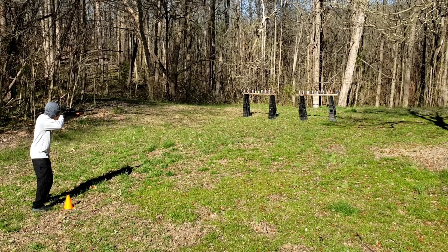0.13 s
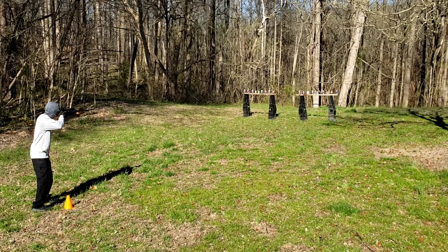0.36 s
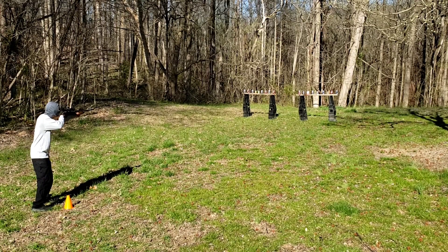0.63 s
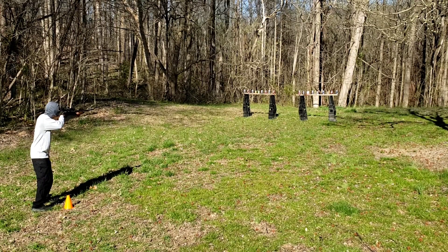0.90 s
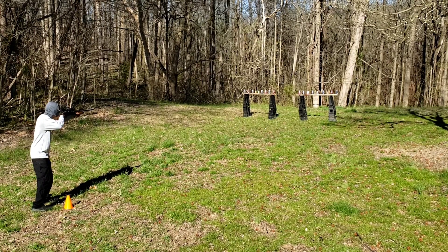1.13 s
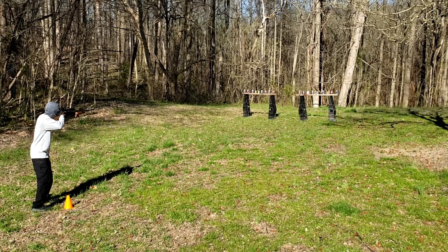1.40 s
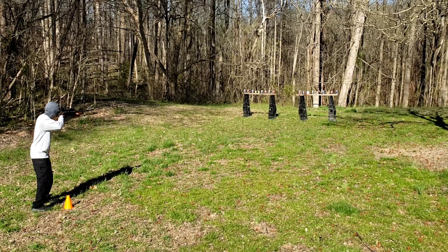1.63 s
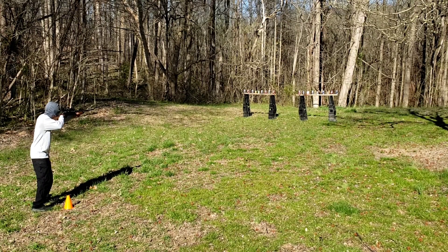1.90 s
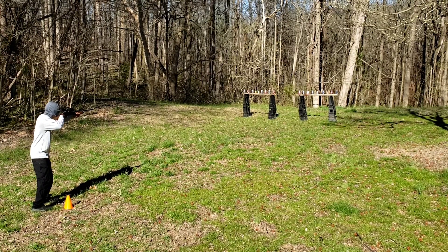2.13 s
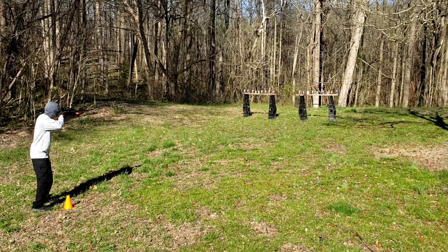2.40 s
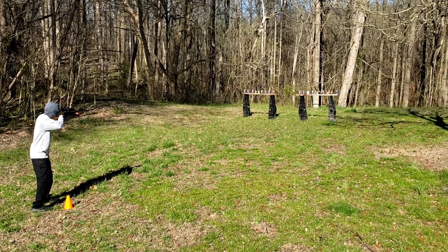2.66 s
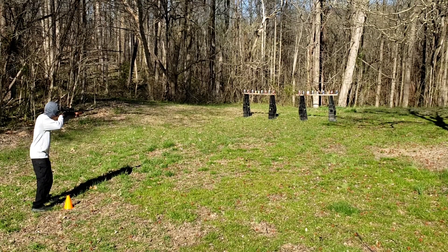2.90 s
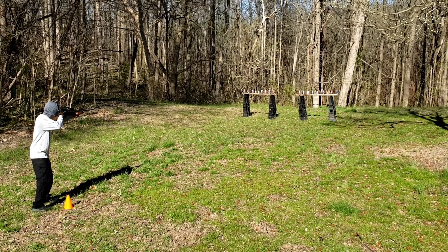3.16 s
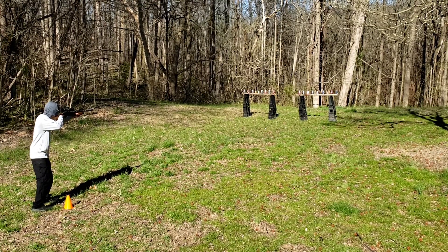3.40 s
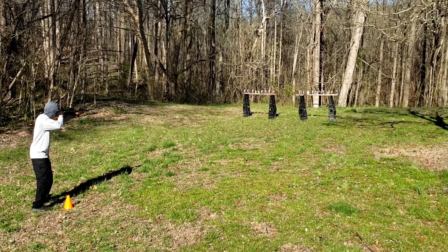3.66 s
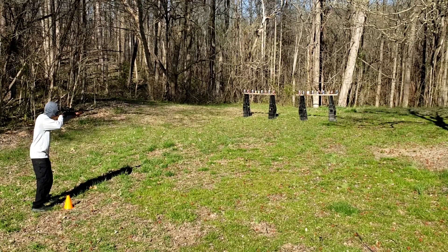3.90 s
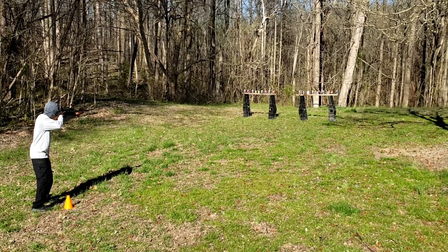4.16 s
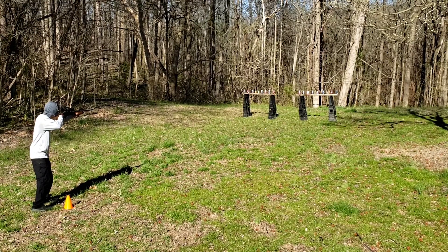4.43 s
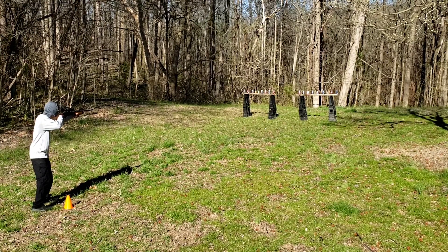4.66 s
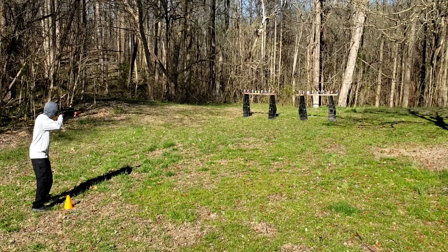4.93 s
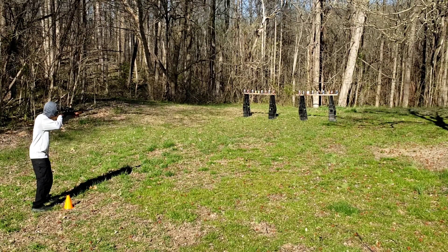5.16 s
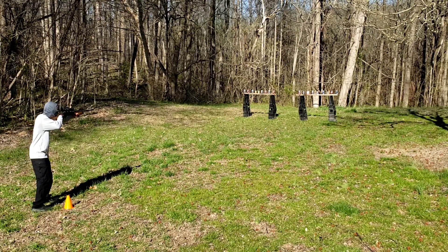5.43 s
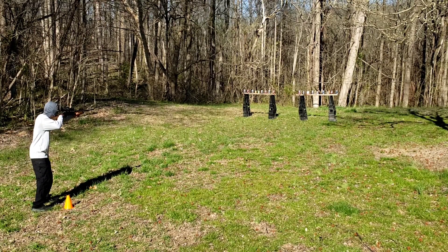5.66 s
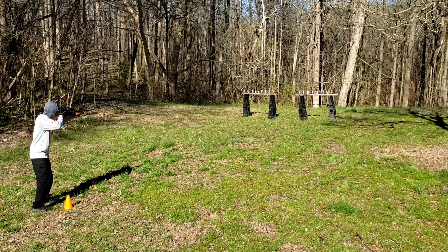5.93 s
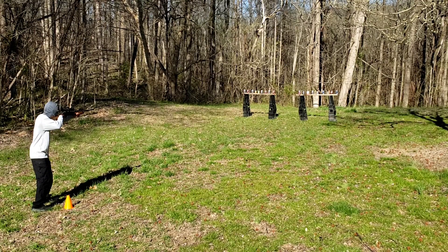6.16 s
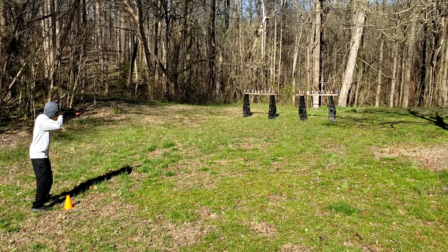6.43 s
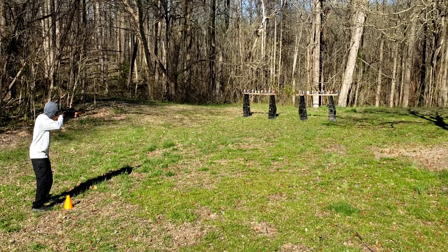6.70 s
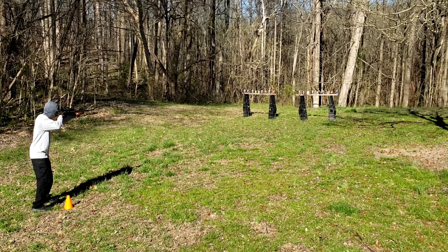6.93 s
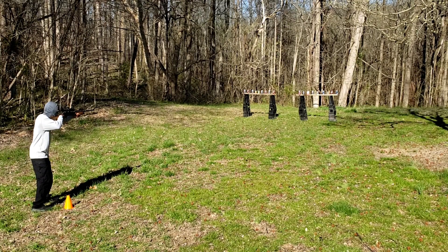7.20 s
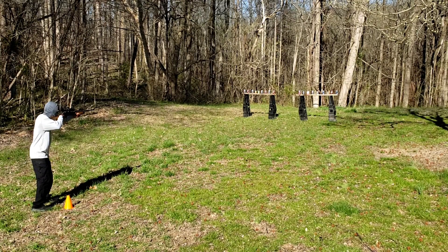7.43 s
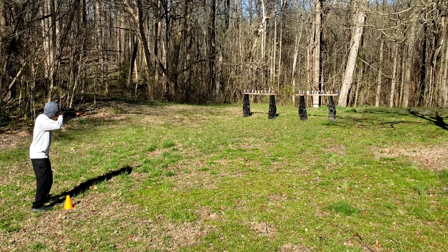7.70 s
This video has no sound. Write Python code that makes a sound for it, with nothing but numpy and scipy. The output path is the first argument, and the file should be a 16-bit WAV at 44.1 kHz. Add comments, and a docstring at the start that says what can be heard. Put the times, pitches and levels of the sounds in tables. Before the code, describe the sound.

Outdoor target shooting on grass at a forest edge. The rifle, left of the stereo microphone, gives four short bright cracks with a light low thump. Small hard hits answer from the distant targets, then the slide is pulled back and shoved forward with rattling metal clicks. Every sound scatters off the trunks as a short hissy tail. Very faint bird whistles early on; low, soft traffic rumble throughout.

```python
"""On a lawn at the edge of a wood, left of the microphone, an air rifle's slide ends a pull and is pushed home.
Then come four shots, each with a jet of gas, a low push of recoil and another rack of the slide. Pellets smack far
targets after each shot. Rifle and slide are clicks, rattles and rings that bounce once off the grass; the trees
answer every shot, stroke and smack with a long hiss of shaped noise. Two faint birds whistle in gliding tones, one
in the first second and one past the second; under it all far traffic rumbles as low noise below a thin hiss."""
import sys
import numpy as np
from scipy import signal
from scipy.fft import rfft, irfft, next_fast_len
from scipy.io import wavfile
from scipy.ndimage import uniform_filter1d, map_coordinates

SR = 44100
rng = np.random.default_rng(int(sys.argv[2]) if len(sys.argv) > 2 else 0)


def decibels_to_gain(level_db):
    """Convert a level in decibels to a linear amplitude gain (20 dB per decade)."""
    exponent = np.asarray(level_db, float) / 20
    return 10 ** exponent


def to_wav(s):
    """Save 16-bit WAV."""
    ch = np.atleast_2d(s).T  # columns
    pcm = np.round(np.clip(ch, -1, 1) * 32767)  # PCM
    wavfile.write(sys.argv[1], SR, pcm.astype(np.int16))


N = 344862  # length in samples

# The four trigger pulls. Each row: start in seconds, strength in dB.
SHOTS = [(0.9946, 1.5), (2.5614, 2), (4.477, 1), (6.2696, 1.5)]
# Blows inside the rifle. Each row: seconds after the pull, crack level in dB, treble over crack in dB,
# stock knock over crack in dB, ring in Hz, rattle's 60 dB decay in seconds.
FIRING = [(0., -25, 9, 4, 1800, .016), (.007, -19, 3, -20, 4410, .01), (.0148, -27, -6, 6, 1370, .018),
          (.0184, -19, 3, -13, 2280, .014), (.0245, -30, 1, -8, 2300, .012)]
# Gas leaving the muzzle: length in seconds, level in dB, treble over that in dB, fall time constant in seconds.
GAS_JET = (0.021, -27.5, -0.5, 0.0065)
# The hammer sliding before it strikes: the same columns as the jet.
HAMMER_SLIDE = (.0095, -52, -2, .001)
# Jolts of air at the muzzle. Each row: seconds after the pull, level in dB, time scale in seconds.
AIR_JOLTS = [(.0004, -21, 0.00027), (0.013, -26, 0.00014)]
# Colour of the firing crack. Each row: frequency in Hz, level in dB.
CRACK_COLOUR = [(500, -27.5), (820, -24.5), (1050, -6), (1400, -2.5), (1800, -3.5), (2800, -6.5), (4400, 0),
                (6000, -3.5), (8000, -19)]


def shots():
    """Hammer, valve and rebound in a fixed order, over jolts of air and the hissing jet."""
    blows = [(s + lag, db + level, *rest) for s, db in SHOTS for lag, level, *rest in FIRING]
    jet_length, jet_db, *jet_rest = GAS_JET
    hammer_length, hammer_db, *hammer_rest = HAMMER_SLIDE
    hisses = [(s, s + jet_length, db + jet_db, *jet_rest) for s, db in SHOTS]
    hisses += [(s - hammer_length, s, db + hammer_db, *hammer_rest) for s, db in SHOTS]
    jolts, t = np.zeros(N), np.arange(SR // 50) / SR
    for s, db in SHOTS:
        for lag, level, width in AIR_JOLTS:
            u = t / width
            dip_and_swell = u * np.e * (u - 2) * np.exp(-u) / 2  # a dip, then a slower swell
            add(jolts, s + lag, decibels_to_gain(db + level) * dip_and_swell)
    metal = contacts(blows, CRACK_COLOUR, click_db=14, ring_db=-6, rise=.0002, alike=TREES_ALIKE)
    return metal + rubs(hisses, CRACK_COLOUR, rise=0.001, grain_db=4.5) + jolts


# Recoil against the shoulder: frequency in Hz, level in dB, 60 dB decay in seconds.
RECOIL = (150, -22, 0.034)


def recoil():
    """One low push that draws in first and is gone after a cycle or two."""
    push, t = np.zeros(N), np.arange(SR // 20) / SR
    hz, db, t60 = RECOIL
    for s, shot_db in SHOTS:
        swing = np.sin(2 * np.pi * hz * t) * (1 - np.exp(-t / 0.0044))
        add(push, s + 0.001, -decibels_to_gain(db + shot_db - 60 * t / t60) * swing)
    return push


# The slide pulled back. Each row: time of the first hard catch in seconds, length from there to the end stop in
# seconds, strength in dB, extra level of the middle catch in dB, extra level of the end stop in dB.
PULLS = [(-.0316, 0.041, 1, -0.5, -5), (1.5117, 0.04, 0.4, 1.5, -2.5), (3.054, .0397, -0.067, 1, 0),
         (5.002, 0.04, 0.39, -1.5, 0.5), (6.8145, 0.037, -0.079, 0, 0)]
# The slide pushed home: the same columns.
PUSHES = [(.161, .0564, -1.1, 2.4, 0.5), (1.7394, .0466, -1.1, 1.8, 2.5), (3.2743, .056, 0.41, 0.49, 0),
          (5.2422, .0548, 0.91, 0.19, -2.5), (7.0331, .0477, -0.13, -0.49, 1)]
# Contacts of one pull. Each row: place along the stroke (0 first hard catch, 1 end stop), crack level in dB,
# treble over crack in dB, stock knock over crack in dB, ring in Hz.
PULL_CONTACTS = [(-.49, -34, -21, -18.5, 1940), (0, -24.5, -12, -17, 2417), (0.556, -26, -12.5, -9, 4740),
                 (0.812, -28.5, 1, -23, 4720), (0.999, -30, -9, -1.5, 2360)]
# Contacts of one push: the same columns.
PUSH_CONTACTS = [(-.09, -43, -6, -16, 1870), (0, -32, -14.5, -16, 1783), (.525, -33, -6, -16, 3700),
                 (.8, -36.5, 10.5, -43, 2890), (0.998, -25.5, -53, -7, 5250)]
# Scrape along the rail in a pull: from and to as places along the stroke, level in dB, treble over that in dB,
# fall time constant in seconds.
PULL_SCRAPE = (.52, 1.15, -39, -1, .014)
# Scrape in a push: the same columns.
PUSH_SCRAPE = (0.74, 1.2, -33.5, -3, 0.0023)
# Colour of the slide's metal. Each row: frequency in Hz, level in dB.
METAL_COLOUR = [(530, -48.5), (900, -12.5), (1030, -5), (1340, -3.5), (1570, -13.5), (1850, -0.5),
                (2050, -10.5), (2300, -2.5), (3320, -3.5), (4480, -1.5), (4770, 0.5), (5650, -6),
                (7500, -12), (9750, -27), (16500, -120)]


def slide():
    """Every stroke meets the same catches in turn, faster or slower, and scrapes between them."""
    rattle_t60 = .026  # s
    strokes = [(row, PULL_CONTACTS, PULL_SCRAPE) for row in PULLS]
    strokes += [(row, PUSH_CONTACTS, PUSH_SCRAPE) for row in PUSHES]
    blows, drags = [], []
    for (s, length, db, middle_db, stop_db), steps, scrape in strokes:
        for extra_db, (place, level, *rest) in zip((0, 0, middle_db, 0, stop_db), steps):
            blows.append((s + place * length, db + level + extra_db, *rest, rattle_t60))
        start, end, level, *rest = scrape
        drags.append((s + start * length, s + end * length, db + level, *rest))
    heard = [blow for blow in blows if blow[0] >= 0]  # the first pull is already under way
    clacks = contacts(heard, METAL_COLOUR, click_db=4.5, ring_db=1.5, rise=0.001, alike=TREES_ALIKE)
    return clacks + rubs(drags, METAL_COLOUR, rise=.006, grain_db=4.5)


# Pellets landing far off. Each row: time in seconds, crack level in dB, treble over crack in dB, ring in Hz.
PELLETS = [(1.279, -27.5, -5, 2370), (1.2965, -42, -16, 1780), (2.627, -33.5, -5, 2480),
           (2.667, -27.5, -17.5, 2274), (4.7993, -32, 0.5, 3430), (4.8394, -42.5, -27, 3760),
           (6.4647, -36, -24, 2970)]


def pellets():
    """Each pellet strikes its target with a hard crack, a short rattle, a ring and a knock."""
    knock_db, t60 = -19.5, 0.018  # over the crack; rattle's 60 dB decay in s
    blows = [(s, db, treble_db, knock_db, hz, t60) for s, db, treble_db, hz in PELLETS]
    return contacts(blows, CRACK_COLOUR, click_db=-2.0, ring_db=-6.0, rise=0.00028, alike=[(1000, 0.72)])


# Modes of the hollow stock. Each row: frequency in Hz, level in dB, 60 dB decay in seconds.
STOCK = [(492, 3.5, 0.052), (574, 2, 0.021), (1036, -9.5, 0.03)]
# Colour of the treble part of clicks, rattles and rubs. Each row: frequency in Hz, level in dB.
TREBLE_COLOUR = [(5000, -26.5), (7000, -5.5), (9500, 0.5), (11500, -2), (13500, -0.5), (15000, -7),
                 (17000, -5)]


def contacts(rows, colour, click_db, ring_db, rise, alike):
    """Each contact: a hard click, a rattle that dies, one loose part ringing, and the stock knocking."""
    rattle, clicks, tones = np.zeros((2, N)), np.zeros((2, N)), np.zeros(N)
    t = np.arange(SR // 12) / SR
    for s, db, treble_db, knock_db, hz, t60 in rows:
        bands = decibels_to_gain([[db], [db + treble_db]])  # body and treble
        shape = decibels_to_gain(-60 * t / max(t60, .003)) * (1 - np.exp(-t / rise))
        add(rattle, s, bands * decibels_to_gain(-3.0) * shape)
        add(clicks, s, -bands * decibels_to_gain(click_db))
        ring_hz = hz * rng.normal(1, .025)
        ring = decibels_to_gain(ring_db - 60 * t / 0.05) * shape * np.sin(2 * np.pi * ring_hz * t)
        knock = np.zeros(len(t))
        for mode_hz, level, life in STOCK:
            mode_db = knock_db + level - 3.5 + rng.normal(0, 1.2)
            knock += decibels_to_gain(mode_db - 60 * t / life) * np.sin(2 * np.pi * mode_hz * t)
        soft_start = 1 - np.exp(-t / 0.0012)  # the stock takes the blow softly
        add(tones, s, decibels_to_gain(db) * (ring + knock * soft_start))
    crack, treble = (clicks[k] + rattle[k] * pair([(100, 0)], alike, N) for k in range(2))
    return coloured(crack, colour) + coloured(treble, TREBLE_COLOUR) + tones


# Left-right likeness of the trees' answer, the rattles and the rubs. Each row: frequency in Hz, likeness (1 same).
TREES_ALIKE = [(600, 0.31), (1400, 0.25), (3000, 0.033)]


def rubs(rows, colour, rise, grain_db):
    """Bursts of gritty broadband noise that hold, then die quickly."""
    t, bands = np.arange(SR // 4) / SR, np.zeros((2, N))
    for start, end, db, treble_db, fall in rows:
        late = t + max(-start, 0)  # a rub begun before time zero is joined part way
        shape = np.clip(late / rise, 0, 1) * np.exp(-np.clip(late - (end - start), 0, 1) / fall)
        add(bands, start, decibels_to_gain([[db], [db + treble_db]]) * shape)
    grit = unit(decibels_to_gain(grain_db * wobble(500)))
    body = bands[0] * pair(colour, TREES_ALIKE, N)
    treble = bands[1] * pair(TREBLE_COLOUR, TREES_ALIKE, N)
    return grit * (body + treble)


# Who answers: the near trunks, the depth of the wood, its far edge. Each row: start in seconds after the sound,
# build-up in seconds, level in dB, fall in dB a second.
TREES = [(.01, .04, 2, 170), (.03, .05, -6, 48), (.158, .015, -4, 200)]
# Colour of the answer. Each row: frequency in Hz, level in dB, share of the treble change (0-1).
TREES_COLOUR = [(150, -8.5, 0.15), (600, 1, 0.3), (3000, 0.5, 0), (5400, -1.5, 0.5), (8000, 0, 0.94),
                (15000, -1, 1.)]


def woods(x, db, nearer=0., loss_db=0., stands=TREES):
    """Countless trunks return each band's energy as diffuse noise; the air eats the treble on the long paths."""
    treble_start_db, treble_loss_db = 3.5, 39  # treble over the rest at first, extra loss a second
    hz, t, z = signal.stft(x, SR, nperseg=128)
    lag = t[t < 1]
    late = lag + nearer  # seconds; a source nearer the trees enters their answer later on
    trees = sum(decibels_to_gain(level - fall_db * (late - start)) ** 2 * np.clip((late - start) / build, 0, 1)
                for start, build, level, fall_db in stands)
    share = np.clip(along(TREES_COLOUR, hz, column=2), 0, 1)[:, None]
    treble_db = share * (treble_start_db - treble_loss_db * late)
    colour_db = along(TREES_COLOUR, hz)[:, None]
    answer = trees * decibels_to_gain(db - 19.0 + colour_db + treble_db - loss_db * lag) ** 2  # loss in dB a second
    energy = signal.fftconvolve(np.mean(np.abs(z) ** 2, axis=0), answer, axes=1)[:, :len(t)]
    trunks = decibels_to_gain(0.94 * wobble(120) + 2.1 * wobble(30))  # single trunks stand out
    noise = signal.stft(pair([(100, 0)], TREES_ALIKE, N) * trunks, SR, nperseg=128)[2]
    noise = noise / np.sqrt(np.mean(np.abs(noise) ** 2))
    return signal.istft(noise * np.sqrt(np.abs(energy)), SR, nperseg=128)[1][:, :N]


# Bird notes. Each row: start in seconds, length in seconds, from Hz, to Hz, level in dB.
BIRDS = [(.29, .07, 5200, 4000, -68), (.545, .08, 5800, 3900, -77), (.815, .08, 5800, 4000, -79),
         (2.09, .11, 2850, 2850, -82), (2.195, .075, 2550, 3000, -82), (2.26, .06, 2050, 2700, -78),
         (2.315, .04, 3100, 2900, -81), (2.395, .03, 3800, 4250, -81), (2.46, .075, 2850, 2800, -81)]


def birds():
    """Short gliding whistles far off among the trees."""
    song = np.zeros(N)
    for s, length, from_hz, to_hz, db in BIRDS:
        t = np.arange(round(length * SR)) / SR
        blur = 750 * uniform_filter1d(rng.standard_normal(len(t)), size=90)  # blurred by leaves
        hz = from_hz + (to_hz - from_hz) * t / length + blur
        swell = np.sin(np.pi * t / length) ** 0.55
        add(song, s, decibels_to_gain(db) * swell * np.sin(2 * np.pi * np.cumsum(hz) / SR))
    song = song * decibels_to_gain(3 * wobble(80)) * decibels_to_gain([[2], [-2]])  # flickering, and to the left
    return song + woods(song, db=7)


# Level of the far traffic. Each row: time in seconds, level in dB.
RUMBLE_LEVEL = [(0.0, -48), (0.67, -48), (0.78, -53), (1.412, -52), (2.2, -48.5), (2.549, -50.5),
                (2.94, -49.5), (3.53, -51.5), (4.4, -50), (4.73, -47.5), (5.31, -48), (5.57, -49.5),
                (6.121, -49), (6.49, -44.5), (6.93, -50), (7.82, -47.5)]
# Colour of the traffic. Each row: frequency in Hz, level in dB.
RUMBLE_COLOUR = [(12, -60.5), (20, -32), (30, -19.5), (47, -7), (70, -0.5), (97, -6.5), (139, -10.5),
                 (173, -17.5), (245, -22), (352, -35.5), (409, -51.5), (500, -43), (650, -74.5),
                 (1100, -120)]
# Colour of the thin hiss. Each row: frequency in Hz, level in dB.
HISS_COLOUR = [(180, -30.5), (300, -10), (507, -16), (727, -19.5), (900, -21.5), (1030, -21.5), (1400, -26),
               (1650, -24.5), (2530, -29.5), (2880, -28.5), (4140, -33.5), (8100, -38.5), (13900, -27.5),
               (15100, -38)]
# Left-right likeness of the background. Each row: frequency in Hz, likeness (1 same, -1 opposed).
AIR_ALIKE = [(60, 0.93), (150, 0.94), (380, -0.026), (940, 0.046), (2340, -0.38), (5860, -0.58),
             (14700, 0.49)]
# Lean of the background. Each row: frequency in Hz, left over right in dB.
AIR_SIDE = [(60, 1), (150, 0.5), (380, 0), (940, 1.5), (2340, 5), (5860, 8), (14700, -1.5)]


def air():
    """Far traffic swells and sags under a thin, even hiss."""
    s, db = np.transpose(RUMBLE_LEVEL)
    level_db = np.interp(np.arange(N) / SR, s, db) + 1.5 * wobble(5)
    traffic = decibels_to_gain(level_db) * pair(RUMBLE_COLOUR + [(700, -74.5)], [(25, 0.57)] + AIR_ALIKE, N)
    hiss = decibels_to_gain(-72) * pair([(200, -42.0)] + HISS_COLOUR, AIR_ALIKE, N)
    return leaned(traffic + hiss, AIR_SIDE)


def unit(x):
    """Scaled to rms 1."""
    return x / np.sqrt(np.mean(x ** 2) + 1e-20)


def along(points, hz, column=1):
    """A column of (Hz, ..) points read on a log axis."""
    table = np.transpose(points)
    return np.interp(np.log(hz + 1), np.log(table[0] + 1), table[column])


def filtered(x, response):
    """x times a complex response of frequency."""
    m = next_fast_len(N + 8192)
    return irfft(rfft(x, m) * response(np.fft.rfftfreq(m, 1 / SR)), m)[..., :N]


def coloured(x, spectrum):
    """x through a colour that keeps the level of white noise."""
    return filtered(x, lambda hz: unit(decibels_to_gain(along(spectrum, hz))))


def leaned(x, side):
    """x with the left port over the right by a table of dB, half up and half down."""
    return filtered(x, lambda hz: decibels_to_gain(along(side, hz) * [[.5], [-.5]]))


def wobble(rate):
    """A smooth random curve, rate knots a second."""
    return map_coordinates(rng.standard_normal(int(N * rate / SR) + 4), [np.arange(N) * rate / SR])


def pair(spectrum, alike, size):
    """Stereo noise of rms 1 with a given colour and left-right likeness."""
    hz = np.fft.rfftfreq(size, 1 / SR)
    turn = np.arccos(np.clip(along(alike, hz), -1, 1)) / 2
    noise = rfft(rng.standard_normal((2, size))) * decibels_to_gain(along(spectrum, hz))
    mid, side = irfft(noise * [np.cos(turn), np.sin(turn)], size)
    return unit(np.array([mid + side, mid - side]))


def add(track, s, sound):
    """Mixes a sound in at a time."""
    spot = track[..., max(round(s * SR), 0):][..., :sound.shape[-1]]
    spot += sound[..., :spot.shape[-1]]


# Bounce off the lawn: delay in seconds, level in dB.
GROUND = (.00226, -3.5)


def lawn(hz):
    """The direct path plus one bounce off soft grass, reaching the left port before the right."""
    soft_hz = 1500  # grass turns the bounce's phase by this over the frequency, in radians, up to half a turn
    port_lag = np.array([[0], [.00009]])  # s
    delay, bounce_db = GROUND
    soft_turn = soft_hz / np.maximum(hz, soft_hz / np.pi)
    bounce = decibels_to_gain(bounce_db) * np.exp(1j * soft_turn - 2j * np.pi * hz * delay)
    return (1 + bounce) * np.exp(-2j * np.pi * hz * port_lag)


# Lean of the microphone's two ports. Each row: frequency in Hz, left over right in dB.
PORTS = [(300, 1), (1200, 2.), (4100, 3.5), (6300, 1.5), (8000, -1), (10000, -6), (14500, -14.5)]


def scene():
    """The rifle reaches the left port first and once more off the lawn; pellets land ahead, close to the trees.
    The muzzle points into the wood; the slide sends little to the far trunks."""
    fired, racked = shots() * decibels_to_gain(-4.0), slide() * decibels_to_gain(-3.5)
    smacks = pellets()
    echoes = woods(fired, db=-3.5) + woods(racked, db=-10.5, loss_db=29.0)
    echoes = echoes + woods(smacks, db=7.5, nearer=.04, stands=TREES[:-1])  # no far edge
    near = filtered(fired + racked, lawn) + recoil() + smacks + echoes
    return leaned(near, PORTS) + air() + birds()


def roll_off(x):
    """The treble ends steeply here."""
    return signal.sosfilt(signal.butter(12, 15260, fs=SR, output="sos"), x)


def record(dry):
    """A steep band limit that leaves a hundredth of the treble above it."""
    top_hz = 14650
    limited = filtered(dry, lambda hz: 1 / (1 + (hz / top_hz) ** 100) + .01)
    return roll_off(limited)


dry = scene()
out = record(dry)
to_wav(out)
```